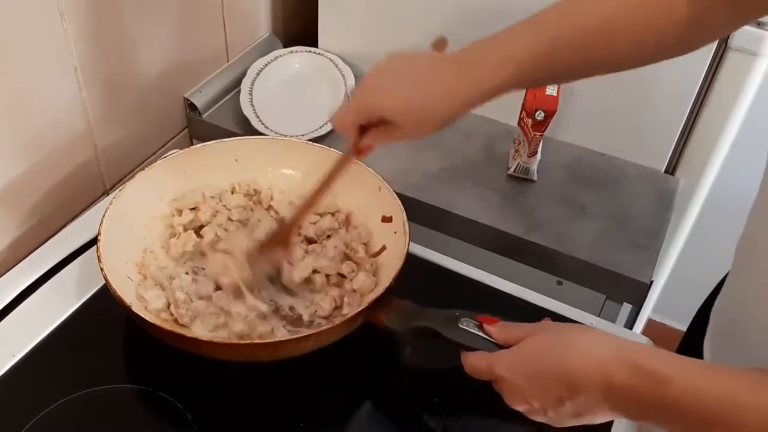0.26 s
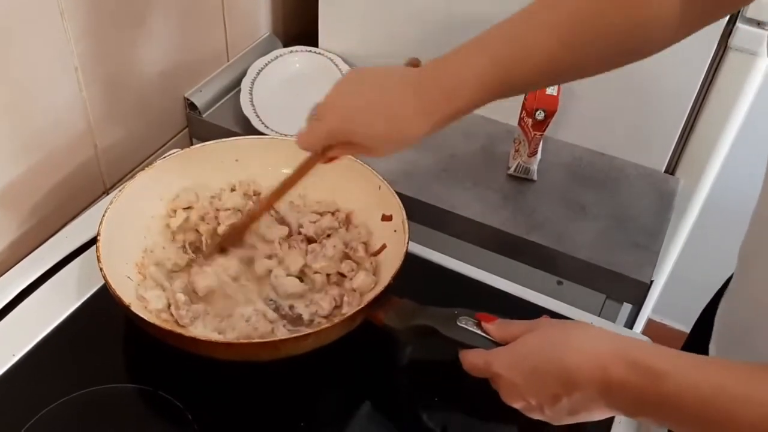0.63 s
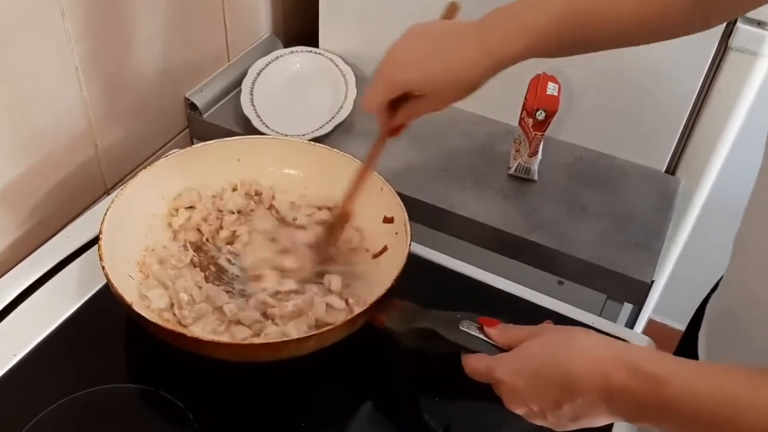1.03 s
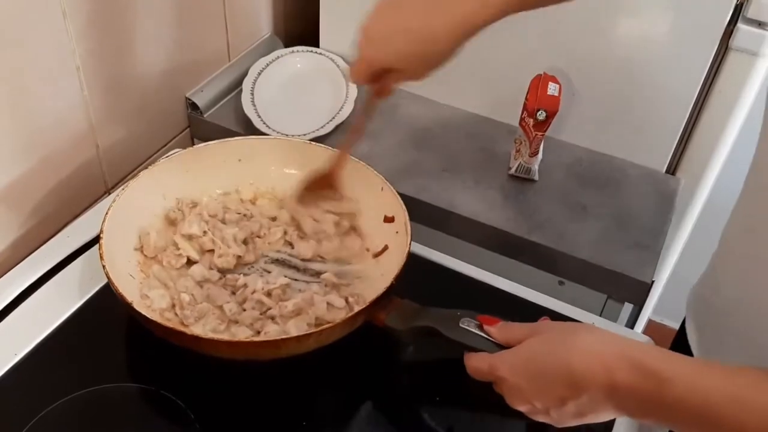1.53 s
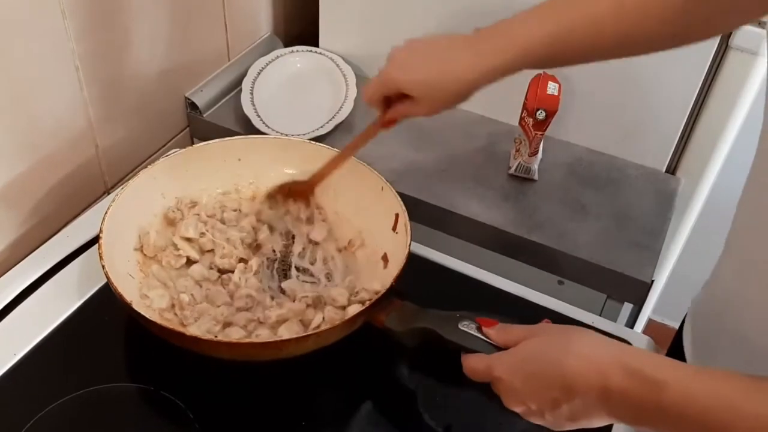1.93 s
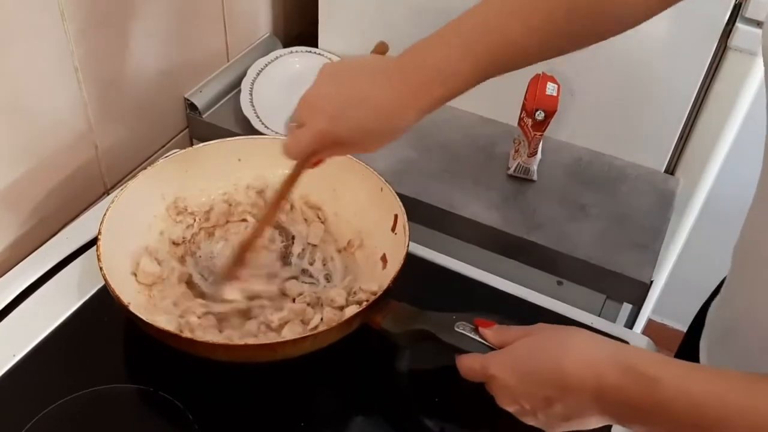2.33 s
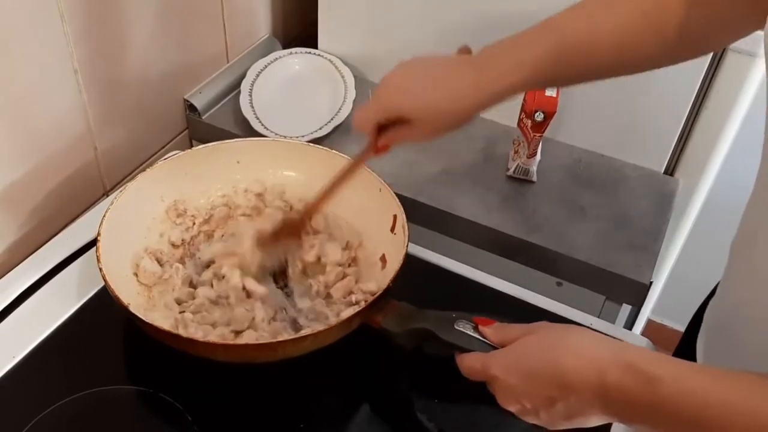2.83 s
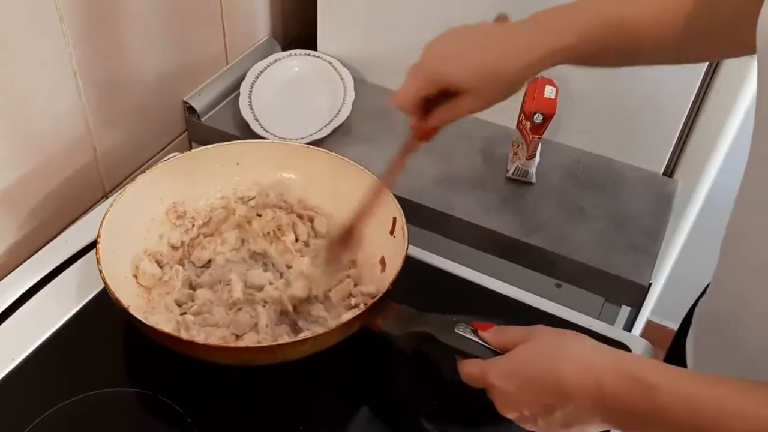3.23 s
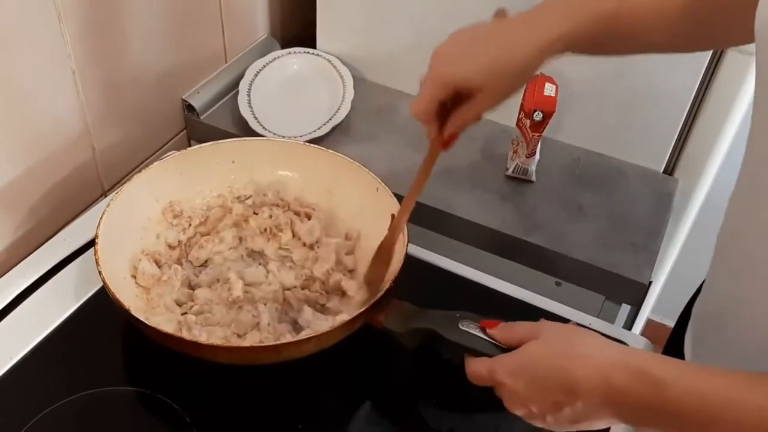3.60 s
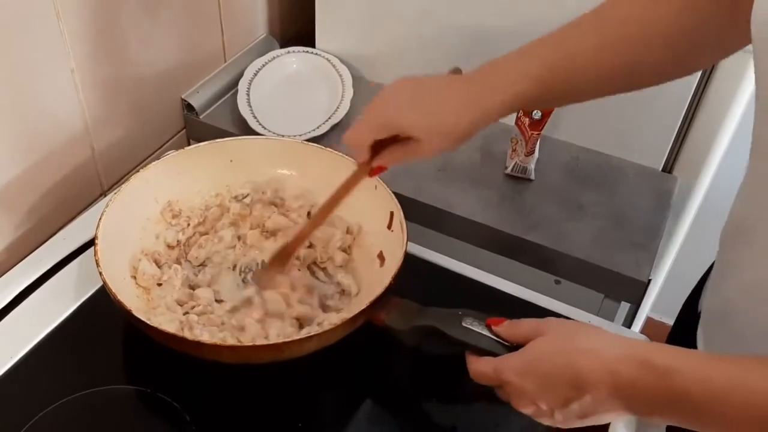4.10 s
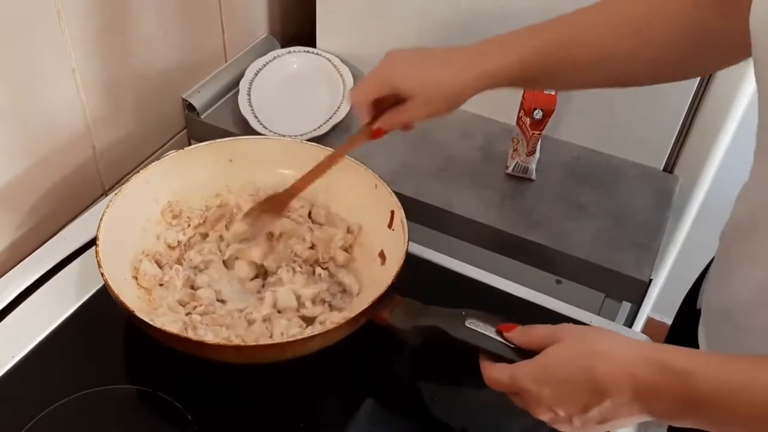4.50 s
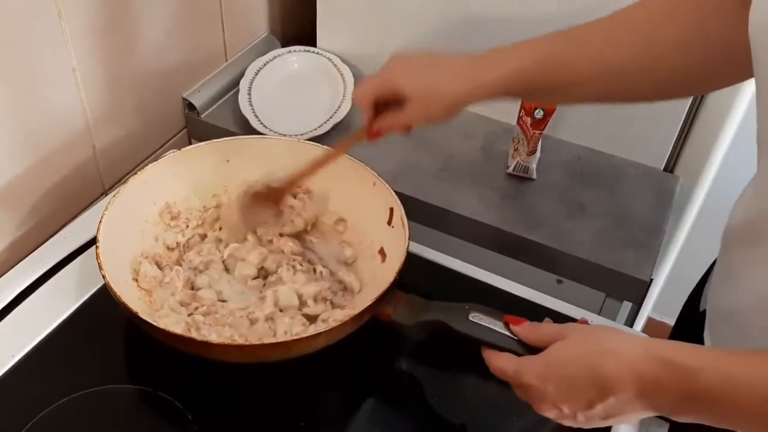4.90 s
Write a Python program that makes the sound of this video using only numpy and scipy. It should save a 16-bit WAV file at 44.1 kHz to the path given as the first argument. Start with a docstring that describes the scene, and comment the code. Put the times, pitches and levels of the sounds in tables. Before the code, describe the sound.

A wet, crackling push opens the sound: a wooden spatula stirring food in creamy sauce in a ceramic pan. The sweeps repeat two or three times a second for about five seconds, with squishes, tiny squeaks and a soft low drag. At about 1.1 seconds the spatula knocks hard on the pan, which rings briefly. A thin click comes slightly left at 1.5 seconds, followed by lighter taps and short rasps until 2 seconds. The pan bumps dully on the hob now and then, most strongly between 1.6 and 2.5 seconds. Wet smacks stand out near 0.8, 2.3 and 3.2 seconds. A second hard knock lands at 3.8 seconds, followed at once by more smacks, then the stirring goes on more gently. Throughout, the sauce sizzles faintly over a low appliance hum, all heard close by in a small kitchen.

```python
"""A wet, crackling push is heard first: a wooden spatula stirs food in a creamy sauce in a ceramic pan.
Air pockets in the sauce burst and squeak, and the blade rasps on the coating by stick-slip friction.
Two hard knocks among lighter ones excite the pan's modes, and the pan bumps dully on the hob.
Behind this, bursting bubbles sizzle faintly over a low hum, in a small kitchen."""
import sys
import numpy as np
from scipy import signal
from scipy.fft import rfft, irfft
from scipy.io import wavfile
from scipy.ndimage import uniform_filter1d

SR = 44100
rng = np.random.default_rng(int(sys.argv[2]) if len(sys.argv) > 2 else 0)


def bounce(signal):
    """Save signal as a 16-bit WAV file at the path given by the first command-line argument."""
    frames = np.transpose(np.atleast_2d(signal))
    limited = np.clip(frames, -1, 1)
    pcm = np.round(limited * 32767).astype(np.int16)
    wavfile.write(sys.argv[1], SR, pcm)


N = 227104

# Sweeps of the blade through the food. Each row: time of greatest speed in seconds, length in seconds,
# then relative levels in dB of wet sliding, drag on the pan and sizzle flare.
BLADE_STROKES = [(0.051, 0.16, -51, -61, -52), (0.429, 0.54, -50, -48.5, -56),
                 (0.851, 0.3, -49, -47, -56.5), (1.228, 0.26, -48, -48.5, -52),
                 (1.668, 0.25, -49.5, -48.5, -66), (1.825, 0.31, -47, -44, -58),
                 (2.066, 0.74, -58.5, -52, -59.5), (2.498, 0.64, -52, -57, -56),
                 (2.952, 0.42, -51, -52, -55.5), (3.314, 0.1, -49.5, -57.5, -57),
                 (3.603, 0.22, -61.5, -52, -57), (4.192, 0.3, -54.5, -54, -57),
                 (4.64, 0.29, -56, -50.5, -65), (4.89, 0.17, -66, -75, -54.5),
                 (5.14, 0.081, -49.5, -52, -50)]
# Blows on the pan. Each row: start in seconds, level in dB, spot struck, contact cut-off in Hz,
# relative level of the bounces inside the pan in dB.
BLADE_KNOCKS = [(1.0794, -29.5, "upper", 9000, 0.5), (1.1665, -53, "upper", 6000, -2),
                (1.585, -45.5, "floor", 1200, 6), (1.8432, -44.5, "floor", 7050, 5),
                (2.0044, -39.5, "bend", 7100, -14), (3.7775, -29.5, "lower", 9050, 0.5)]
# Rasps on the coating. Each row: start in seconds, length in seconds, level in dB, spot, contact
# cut-off in Hz, relative grit level in dB, slips per second, unevenness from 0 to 1.
BLADE_RASPS = [(1.588, 0.02, -51, "floor", 1100, -21, 720, 0.54),
               (1.631, 0.031, -47, "floor", 786, -30, 650, 0.41),
               (1.752, 0.047, -47, "floor", 1020, -10, 905, 0.21),
               (1.83, 0.035, -48.5, "floor", 6300, -1.5, 900, 0.4),
               (1.977, 0.021, -36, "bend", 1690, -9, 760, .45),
               (1.999, 0.0164, -41.5, "bend", 3850, -9, 1100, .45),
               (2.015, 0.014, -39.5, "bend", 1700, -6, 1220, .07),
               (3.808, 0.011, -40, "lower", 3970, -13, 2690, 0.09)]
# Hollow scrapes. Each row: start in seconds, length in seconds, level in dB, first and last pitch in Hz.
HOLLOW_SCRAPES = [(0, 0.292, -68, 520, 479.4), (0.705, 0.13, -64, 3900, 2020),
                  (2.46, 0.048, -62, 1488, 1690), (2.758, 0.31, -67.5, 1905, 2188),
                  (4.537, 0.13, -70, 1735, 2340)]
# Wet smacks and squeaks. Each row: start in seconds, level in dB, centre frequency in Hz.
SAUCE_SMACKS = [(0.029, -50.5, 1870), (0.2367, -56.5, 1750), (0.423, -56, 1900), (0.5427, -49, 3370),
                (0.805, -43.5, 5000), (.822, -49, 1980), (2.3152, -40.5, 4100), (2.474, -48, 3180),
                (2.494, -54, 2000), (2.815, -56, 2900), (3.222, -41, 4630), (3.313, -52.5, 2310),
                (3.5555, -46.5, 5650), (3.625, -46, 4220), (3.8543, -36, 6100), (3.874, -41.5, 4960),
                (4.906, -47, 4940)]
FOOD_SQUEAKS = [(0.234, -47.5, 3924), (2.315, -54, 3010), (5.056, -54, 4000)]
# Bumps on the hob. Each row: start in seconds, level in dB, rocking pitch in Hz, its t60 in seconds.
HOB_BUMPS = [(0.306, -40, 191.4, 0.27), (0.375, -34.5, 200, 0.082), (.719, -40.5, 196, 0.064),
             (0.753, -44.5, 195, 0.14), (0.788, -40, 195.4, 0.33), (1.082, -38, 204.3, 0.18),
             (1.584, -38.5, 209, 0.091), (1.633, -29.5, 205.5, 0.24), (1.665, -37.5, 205, 0.14),
             (1.768, -38.5, 206, 0.078), (1.792, -41, 199, 0.1), (1.821, -30, 213.5, 0.098),
             (1.977, -40, 200, 0.18), (2.13, -34.5, 156, 0.065), (2.158, -34.5, 199, 0.12),
             (2.445, -33.5, 203, 0.075), (3.231, -40, 181, 0.061), (3.783, -34.5, 192, 0.12),
             (3.852, -37, 189.5, 0.16)]
# Modes of the pan. Each row: frequency in Hz, t60 in seconds, then levels in dB when struck on the
# upper wall, lower wall, floor and bend.
PAN_MODES = [(609, .22, -13, -10, -2, -4), (685, .15, -17, -17, -3, -12), (750, .13, -22, -16, -5, -3),
             (902, .19, -4, -2, 0, -4), (961, .19, -13, -2, -11, -10), (1106, .16, -13, -4, -2, 2),
             (1218, .12, -4, 0, 2, 3), (1308, .12, 3, -5, -5, -4), (1421, .13, 0, 1, -5, -3),
             (1522, .14, 2, -3, -8, -3), (1610, .16, -8, -11, -10, -4), (1815, .13, -18, -1, -10, -5),
             (2196, .15, -10, -1, -9, -6), (2307, .14, -20, -3, -5, -5), (2660, .15, -3, -12, -12, -16),
             (2707, .17, -3, -4, -12, -18), (2799, .23, 3, -8, -10, -13), (3060, .17, 2, -18, -11, -14),
             (3150, .13, -2, -15, -14, -13), (3700, .12, -1, -13, -9, -10)]
# Modes of the loaded pan on the hob. Each row: frequency in Hz, relative level in dB, t60 in seconds.
LOADED_PAN_MODES = [(96.4, -22, 0.38), (144.5, -17.5, 0.35), (287, -15, 0.14), (330, -17, 0.17),
                    (460, -13.5, 0.077)]
# Spectral shapes. Each row: frequency in Hz, relative spectral density in dB.
CLACK_SPECTRA = {"upper": [(30, -55), (150, -12), (780, -9), (1000, -6.5), (1270, 7), (1600, 0),
                 (1950, -7.5), (2400, -3), (2830, 5.5), (3300, 2), (3750, 6), (4500, -8), (5200, -2),
                 (6300, -12), (7600, -33), (16000, -31)], "lower": [(30, -54), (150, -7.5), (600, -5.5),
                 (950, 2), (1300, 5.5), (1650, 4), (2300, 7.5), (2700, -0.5), (3150, -4.5), (3900, -2),
                 (4300, -7.5), (5800, -7), (6800, -14), (7600, -33), (16000, -50)], "floor": [(30, -54),
                 (130, -17), (450, -1), (780, -4), (980, -3), (1280, -3), (1600, -4), (1950, -4),
                 (3000, -1.5), (4500, 2.5), (6400, 0.5), (7500, -24), (16000, -40)], "bend": [(30, -52),
                 (150, -20), (350, 5.5), (500, -5), (780, -5), (1200, 3.5), (1650, 4.5), (2250, 3.5),
                 (2700, -3), (3700, 4.5), (6400, 1), (7500, -29), (16000, -29)]}  # wood on ceramic, one table for each spot
CRACKLE_SPECTRUM = [(200, -32), (600, 7.5), (1100, 4.5), (1450, -0.5), (1900, 8), (2550, 4), (3800, 8),
                    (5500, 10), (6600, 9), (7800, -5), (16000, -54)]  # sliding wet food
DRAG_SPECTRUM = [(25, -64.5), (82, -5.5), (100, -17), (140, 2), (195, 2.5), (260, -8), (330, -7.5),
                 (480, -14), (800, -30.5), (2000, -51)]  # food dragging on the pan
SIZZLE_SPECTRUM = [(200, -10), (1000, -5), (1750, 0), (2050, -1), (2450, -6.5), (2900, -4.5), (3400, 1),
                   (5000, 5), (6500, 3.5), (7800, 0), (15500, 1)]  # bursting bubbles
MURMUR_SPECTRUM = [(20, -33), (35, -10), (63, -32), (95, -1), (170, 20), (205, 1), (270, -5), (400, -1),
                   (700, -20), (1500, -39.5)]  # appliances
# Partials of the mains hum. Each row: frequency in Hz, level in dB.
MAINS_PARTIALS = [(49, -78), (99, -65), (199, -64)]
# Reverberation of the kitchen. Each row: frequency in Hz, t60 in seconds.
ROOM_T60 = [(150, 0.076), (600, 0.61), (2500, 0.31), (6000, 0.2), (14000, 0.026)]
# Coherence of the diffuse field. Each row: frequency in Hz, left-right correlation from 0 to 1.
COHERENCE = [(60, .97), (200, .97), (350, .9), (650, .7), (1400, .2), (3000, 0), (16000, 0)]


def stirring(crackle_db=-4, squish_db=-6, squelch_db=-13, drag_db=-2, clump_db=2.5):
    """Sliding friction: wet food crackles in clumps and squishes, and its drag rumbles in the pan."""
    clumps = gain_of(clump_db * slow_noise(400))
    crackle = diffuse_noise(lambda: pops(per_s=2500, range_db=-3.5) * clumps, CRACKLE_SPECTRUM)
    rumble = diffuse_noise(lambda: rng.standard_normal(N), DRAG_SPECTRUM)
    wet = gain_of(crackle_db) * crackle + gain_of(squish_db) * squishes()
    wet += gain_of(squelch_db) * squelches()
    drag = gain_of(drag_db) * rumble
    return stroke_gain("wet", rest_db=-62.5) * wet + stroke_gain("drag", rest_db=-57) * drag


def stroke_gain(layer, rest_db, rise_share=0.44, fall_share=0.32):
    """Incoherent sounds add in power: each sweep swells and fades above a resting level."""
    column = ("wet", "drag", "sizzle").index(layer)
    t, power = np.arange(N) / SR, gain_of(rest_db) ** 2
    for s, length, *levels_db in BLADE_STROKES:
        from_peak = abs(t - s) / (length * np.where(t < s, rise_share, fall_share))
        power = power + (gain_of(levels_db[column]) * np.exp(-from_peak ** 1.16)) ** 2
    return np.sqrt(power)


def squishes(lowest_hz=3100, highest_hz=6200, tilt=0.19, decay_cycles=8):
    """Cavity resonance: small air pockets burst at three places in the pan, each at its own pitch."""
    t, places = np.arange(SR // 25) / SR, np.zeros((3, N))
    for k, hz in enumerate(np.geomspace(lowest_hz, highest_hz, 24)):
        burst = (hz / lowest_hz) ** tilt * np.exp(-t * hz / decay_cycles) * np.sin(2 * np.pi * hz * t)
        places[k % len(places)] += signal.oaconvolve(pops(per_s=70, range_db=6), burst)[:N]
    return unit_rms(sum(kitchen(place, near_db=-5.5, tail_db=0.5) for place in places))


def squelches(lowest_hz=1300, highest_hz=3200, tilt=0.65, decay_cycles=12, glide=5):
    """A shrinking cavity rises in pitch: larger pockets open behind the blade and close again."""
    t, out = np.arange(SR // 20) / SR, np.zeros(N)
    for hz in np.geomspace(lowest_hz, highest_hz, 12):
        age = t * hz / decay_cycles
        envelope = (hz / lowest_hz) ** tilt * np.sqrt(age) * np.exp(-age)
        pocket = envelope * np.sin(2 * np.pi * hz * t * (1 + glide * t))
        out += signal.oaconvolve(pops(per_s=3, range_db=0), pocket)[:N]
    return unit_rms(kitchen(out, near_db=3, tail_db=-2.5))


def knocks():
    """Impact excitation: the blade hits the pan, and a softer contact passes less treble."""
    out = np.zeros((2, N))
    for s, db, spot, contact_hz, inside_db in BLADE_KNOCKS:
        blow = struck_pan(spot, ring_db=-2.5, near_db=0.5, tail_db=-6.5, inside_db=inside_db)
        hit = lowpass(blow, contact_hz, order=3)
        add(out, s, gain_of(db) * hit / hit[:, :SR // 20].std())
    return out


def struck_pan(spot, ring_db, near_db, tail_db, inside_db=-3.5, inside_s=0.005):
    """Impulse response: a clack echoes in pan and room, and the spot struck sets each mode's level."""
    t = np.arange(SR // 2) / SR
    bounces = diffuse(rng.standard_normal((2, len(t)))) * np.exp(-t / inside_s)
    paths = kitchen(signal.unit_impulse(len(t)), near_db, tail_db)
    paths += gain_of(inside_db) * unit_rms(bounces) / np.sqrt(len(t))
    clack = np.array([colour(path, CLACK_SPECTRA[spot]) for path in paths])
    column = list(CLACK_SPECTRA).index(spot)
    modes = [(hz, levels_db[column], t60) for hz, t60, *levels_db in PAN_MODES]
    rings = np.array([ring(modes, rise_s=0.00054, phase_scatter=0.95) for _ in range(2)])
    return unit_rms(clack) + gain_of(ring_db) * unit_rms(diffuse(rings))


def ring(modes, rise_s, phase_scatter):
    """Free vibration is a sum of damped sines, which builds up as the blow spreads."""
    t = np.arange(SR // 2) / SR
    sines = sum(gain_of(db - 60 * t / t60) * np.sin(2 * np.pi * (hz * t + phase_scatter * rng.random()))
                for hz, db, t60 in modes)
    return sines * (1 - np.exp(-t / rise_s))


def rasps(grit_hz=4000):
    """Stick-slip friction rings the pan under a fine grit: uneven slips rasp, even ones squeal."""
    out = np.zeros((2, N))
    for s, length, db, spot, contact_hz, grit_db, slips_per_s, unevenness in BLADE_RASPS:
        gaps, sizes = np.exp(unevenness * rng.standard_normal((200, 2)).T)
        slip_s = (np.cumsum(gaps) - gaps[0]) / slips_per_s
        n = int(length * SR)
        pressure = signal.windows.tukey(n, 0.071)
        slips = np.bincount((slip_s * SR).astype(int), sizes, n)[:n] * pressure
        response = struck_pan(spot, ring_db=-5.5, near_db=9, tail_db=-8.5)
        body = lowpass(signal.fftconvolve(slips[None], response, axes=1), contact_hz, order=3)
        friction = rng.standard_normal(SR // 2) * np.pad(pressure, (0, SR // 2 - n))
        grit = kitchen(lowpass(friction, grit_hz, order=1), near_db=5, tail_db=4)
        add(out, s, gain_of(db) * body / body[:, :n].std())
        add(out, s, gain_of(db + grit_db) * grit / grit[:, :n].std())
    return out


def smacks(relative_width=0.46, decay_cycles=9.4):
    """Adhesion fails: sauce leaves the blade in damped crackles, and large, low pockets last longer."""
    out, t = np.zeros(N), np.arange(SR) / SR
    for s, db, hz in SAUCE_SMACKS:
        resonance = signal.iirpeak(hz, 1 / relative_width, fs=SR)
        band = signal.lfilter(*resonance, rng.laplace(size=len(t)))
        crackle = unit_rms(lowpass(band, 2 * hz))
        add(out, s, gain_of(db) * crackle * np.exp(-t * hz / decay_cycles))
    return kitchen(out, near_db=3.5, tail_db=1.5)


def scrapes(width_hz=440):
    """Friction excites the cavity between blade and pan; its resonance slides as the gap changes."""
    out = np.zeros(N)
    for s, length, db, from_hz, to_hz in HOLLOW_SCRAPES:
        n = int(length * SR)
        friction = lowpass(rng.laplace(size=SR), width_hz / 2)[:n]
        hollow = unit_rms(friction * gliding_sine(np.geomspace(from_hz, to_hz, n)))
        add(out, s, gain_of(db) * hollow * signal.windows.tukey(n, 0.5))
    return kitchen(out, near_db=0.5, tail_db=-5)


def squeaks(waver_depth=0.04, rise_s=0.002, decay_s=0.0033):
    """Flow-driven oscillation: air squeezed from under the food gives short, wavering chirps."""
    out, t = np.zeros(N), np.arange(SR // 10) / SR
    envelope = (1 - np.exp(-t / rise_s)) * np.exp(-t / decay_s)
    for s, db, hz in FOOD_SQUEAKS:
        waver = 1 + waver_depth * unit_rms(uniform_filter1d(rng.standard_normal(len(t)), size=120))
        add(out, s, gain_of(db) * envelope / envelope.max() * gliding_sine(hz * waver))
    return kitchen(out, near_db=9, tail_db=-17)


def bumps(footing_hz=340, lowest_hz=75):
    """Damped rocking on the hob: a soft footing cuts treble; the pan is too small to radiate deep bass."""
    out = np.zeros((2, N))
    for s, db, hz, t60 in HOB_BUMPS:
        rocking = ring(LOADED_PAN_MODES + [(hz, 0, t60)], rise_s=0.0032, phase_scatter=0)
        thud = lowpass(rocking, footing_hz)
        add(out, s, gain_of(db) * kitchen(thud / abs(thud).max(), near_db=-16, tail_db=-9))
    return signal.sosfilt(signal.butter(2, lowest_hz, "high", fs=SR, output="sos"), out)


def tick(start_s=1.5352, db=-27.5, right_db=-7, lowest_hz=2500):
    """A short pulse has a broad spectrum: one thin click with no ring, to the left."""
    out = np.zeros((2, N))
    click = rng.standard_normal(60) * np.hanning(60)
    thin = click - lowpass(click, lowest_hz, order=1)
    add(out, start_s, gain_of([[db], [db + right_db]]) * thin)
    return out


def simmer(surge_db=1.9):
    """Shot noise of tiny bursting bubbles: the sizzle surges, and flares as strokes bare the hot pan."""
    fizz = diffuse_noise(lambda: pops(per_s=15000, range_db=4.5), SIZZLE_SPECTRUM)
    surges = gain_of(surge_db * slow_noise(2400))
    return stroke_gain("sizzle", rest_db=-57.5) * surges * fizz


def appliances(murmur_db=-62):
    """A line spectrum of mains hum lies over the continuous low murmur of appliances."""
    t = np.arange(N) / SR
    hum = sum(np.sqrt(2) * gain_of(db) * np.sin(2 * np.pi * (hz * t + rng.random()))
              for hz, db in MAINS_PARTIALS)
    return hum + gain_of(murmur_db) * diffuse_noise(lambda: rng.standard_normal(N), MURMUR_SPECTRUM)


def kitchen(x, near_db, tail_db, near_decay_s=0.014, echoes_per_s=2000):
    """Reverberation: direct sound, early reflections from hob and tiles, then a short diffuse tail."""
    t = np.arange(SR // 2) / SR
    signs = rng.choice([-1., 1.], (2, len(t)))
    arrivals = rng.random((2, len(t))) < echoes_per_s / SR
    near = signs * arrivals * np.exp(-t / near_decay_s) * (t > 0.001)
    hz, frame_s, noise = signal.stft(rng.standard_normal((2, len(t))), SR, nperseg=256)
    decay = gain_of(-60 * frame_s / value_at(ROOM_T60, hz)[:, None])
    tail = signal.istft(noise * decay, SR, nperseg=256)[1][:, :len(t)] * (t > 0.006)
    echoes = diffuse(gain_of(near_db) * unit_rms(near) + gain_of(tail_db) * unit_rms(tail))
    return x + signal.fftconvolve(x[None], echoes / np.sqrt(len(t)), axes=1)[:, :len(x)]


def diffuse(pair):
    """Diffuse-field coherence: two unrelated signals become alike in the bass, not in the treble."""
    left, other = rfft(pair)
    shared = value_at(COHERENCE, np.fft.rfftfreq(len(pair[0]), 1 / SR))
    return irfft([left, shared * left + np.sqrt(1 - shared ** 2) * other], len(pair[0]))


def diffuse_noise(source, spectrum):
    """Source and filter: two draws of a noise take on one spectrum and form a diffuse field."""
    return diffuse([unit_rms(colour(source(), spectrum)) for _ in range(2)])


def pops(per_s, range_db):
    """A Poisson process: impulses of random sign and size arrive independently."""
    sizes = gain_of(range_db * np.minimum(rng.exponential(1, N), 4))
    return unit_rms(sizes * rng.choice([-1, 1], N) * (rng.random(N) < per_s / SR))


def slow_noise(samples):
    """Two moving averages leave only the slow fluctuations of noise."""
    return unit_rms(uniform_filter1d(uniform_filter1d(rng.standard_normal(N), samples), samples // 2))


def gliding_sine(hz):
    """Phase is the running integral of frequency."""
    return np.sin(2 * np.pi * np.cumsum(hz) / SR)


def colour(x, spectrum, size=4096):
    """A minimum-phase filter imposes a spectrum causally."""
    log_gain = np.log(gain_of(value_at(spectrum, abs(np.fft.fftfreq(size, 1 / SR)))))
    taps = np.fft.ifft(np.exp(np.conj(signal.hilbert(log_gain)))).real[:size // 2]
    return signal.fftconvolve(x, taps)[:len(x)]


def lowpass(x, hz, order=2):
    """Attenuates the treble above a cut-off."""
    return signal.sosfilt(signal.butter(order, hz, fs=SR, output="sos"), x)


def value_at(points, hz):
    """Interpolates a table on a log-frequency axis."""
    frequencies, values = np.transpose(points)
    return np.interp(np.log(hz + 1), np.log(frequencies), values)


def gain_of(db):
    """Converts decibels to amplitude."""
    return 10 ** (np.asarray(db) / 20)


def unit_rms(x):
    """Normalises to unit mean power."""
    return x / np.sqrt(np.mean(x ** 2) + 1e-20)


def add(mix, s, sound):
    """Superposes a sound starting at s seconds."""
    part = mix[..., round(s * SR):][..., :sound.shape[-1]]
    part += sound[..., :part.shape[-1]]


def scene():
    """Superposition: the pressures from spatula, pan, sauce and room add."""
    spatula = knocks() + rasps() + stirring() + scrapes() + squeaks() + smacks()
    return spatula + bumps() + simmer() + appliances() + tick()


def record(dry, left_db=-1.0, lag_samples=4, edge_hz=15780):
    """Path difference: the nearer left microphone leads, though quieter; both are band-limited."""
    pair = np.array([gain_of(left_db) * dry[0], np.pad(dry[1], (lag_samples, 0))[:N]])
    band_limit = signal.firwin(2047, edge_hz, window=("kaiser", 9), fs=SR)
    return signal.oaconvolve(pair, band_limit[None], "same")


dry = scene()
out = record(dry)
bounce(out)
```